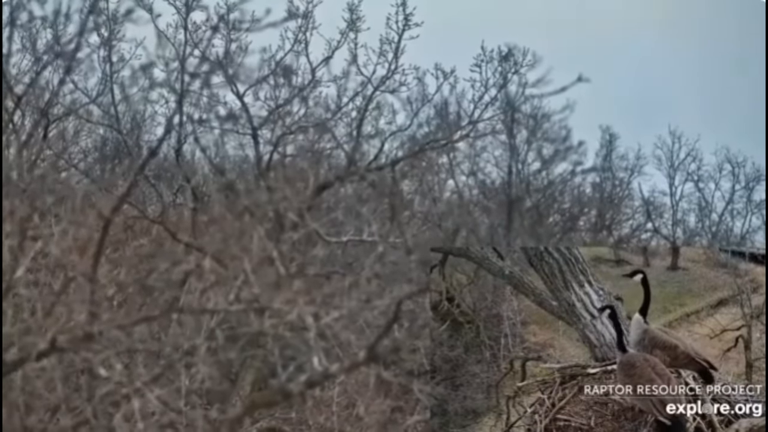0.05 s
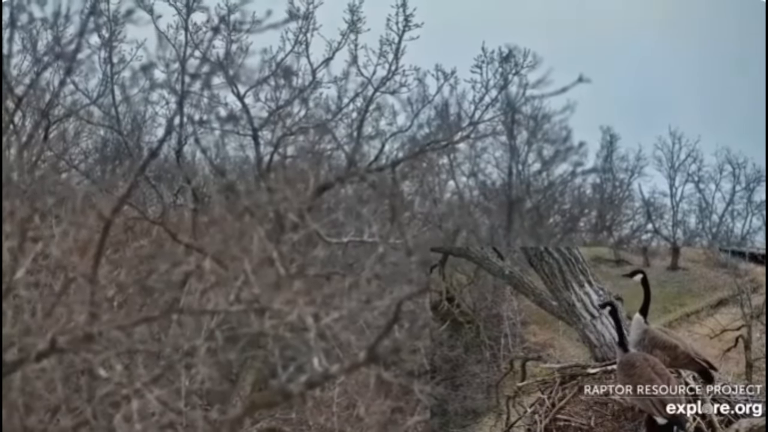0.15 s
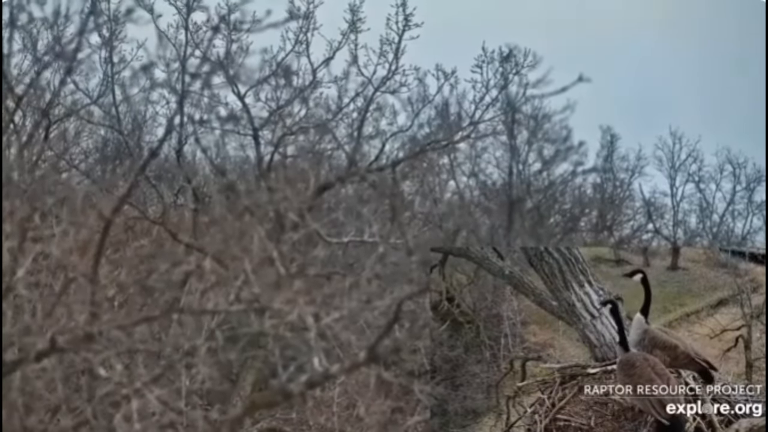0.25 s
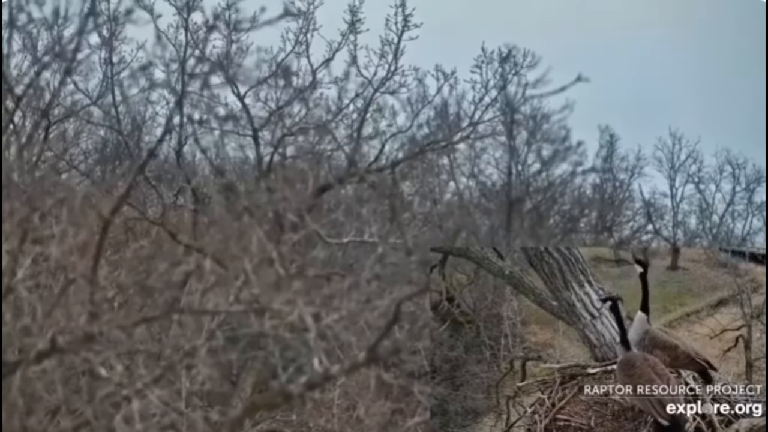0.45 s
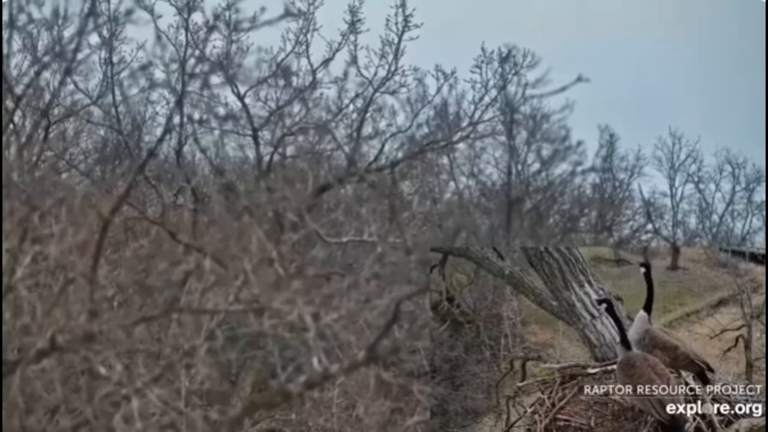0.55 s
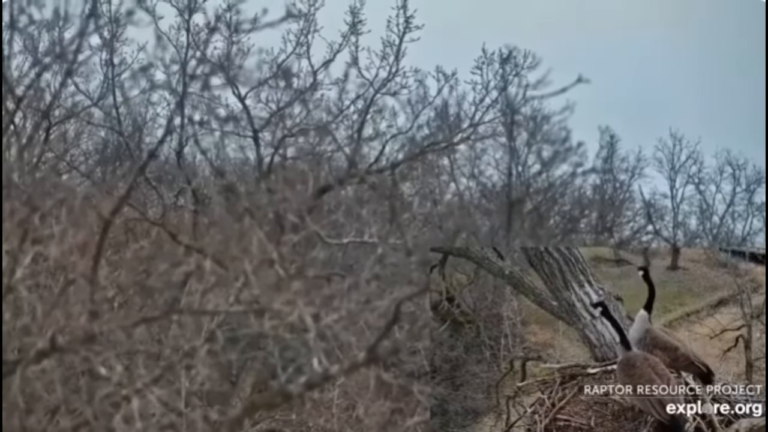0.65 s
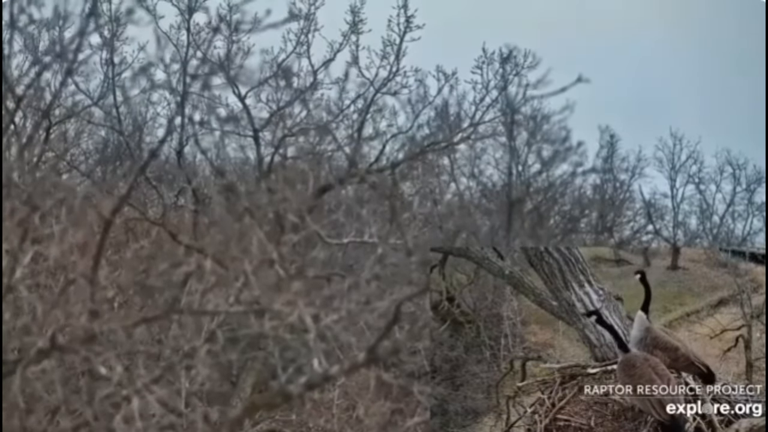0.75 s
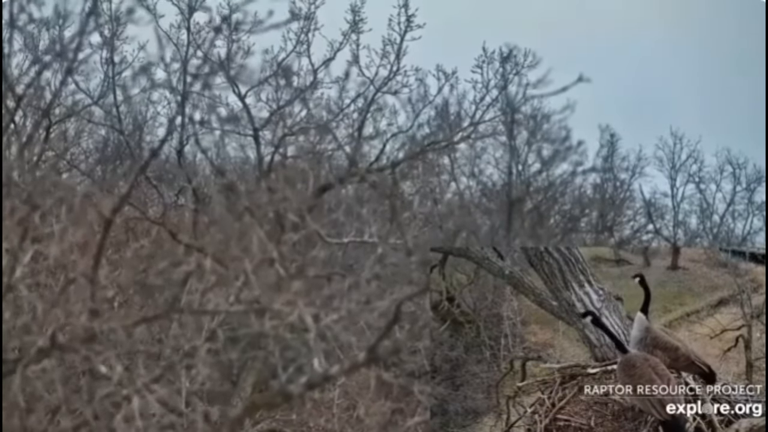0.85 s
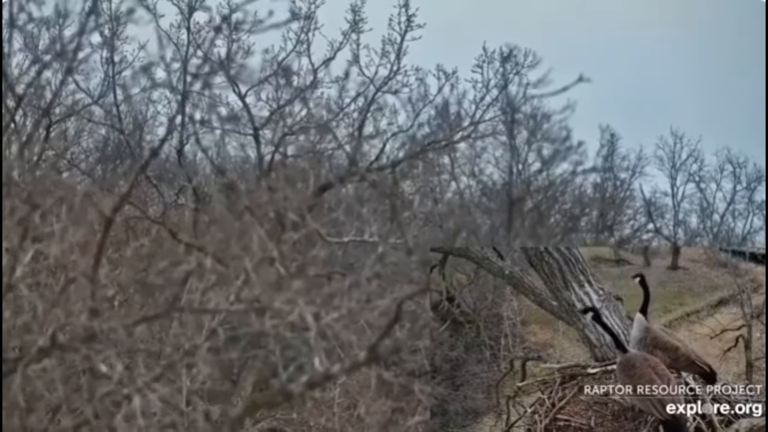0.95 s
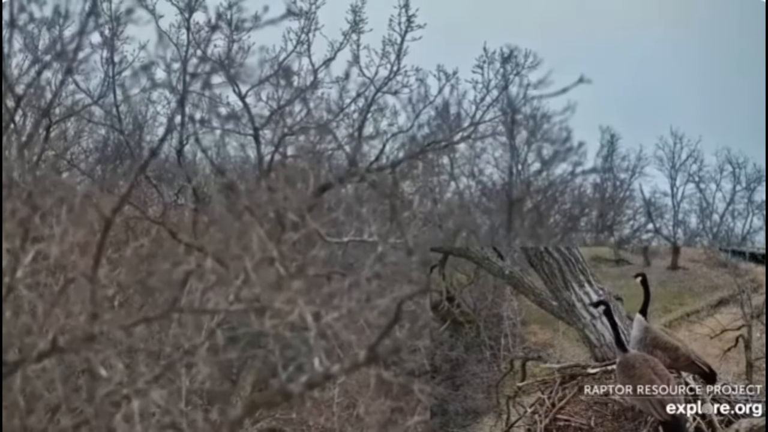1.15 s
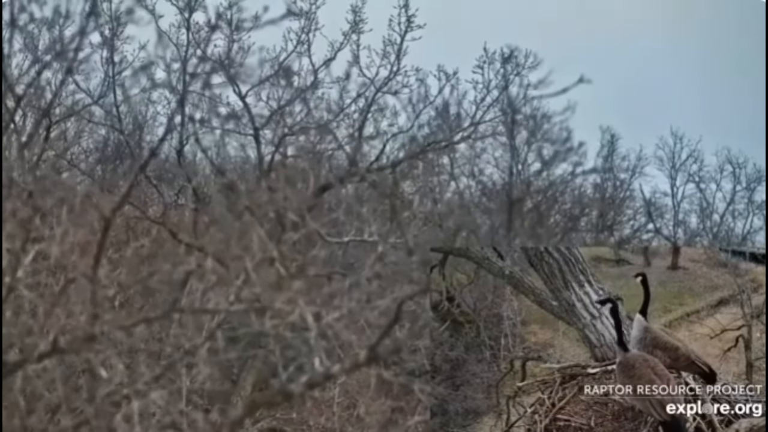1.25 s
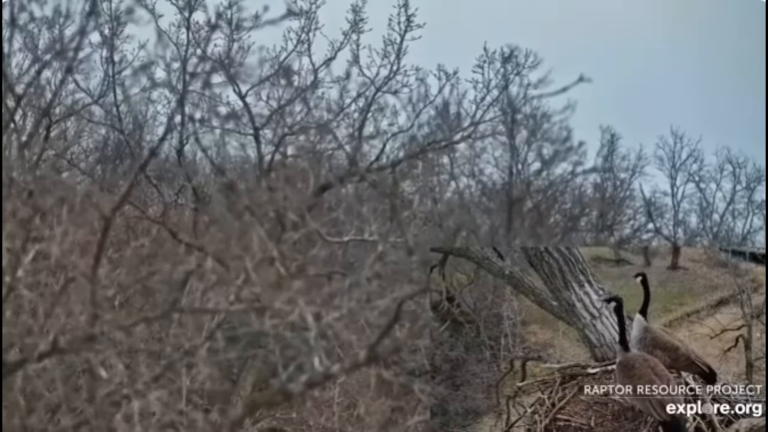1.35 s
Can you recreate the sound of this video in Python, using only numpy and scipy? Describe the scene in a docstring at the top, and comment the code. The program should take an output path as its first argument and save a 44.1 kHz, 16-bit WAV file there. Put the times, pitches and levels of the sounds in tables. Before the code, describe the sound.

Overlapping goose calls, one raspy grunting and one clear honking, overload a close microphone outdoors

```python
"""A quiet outdoor hush of shaped noise opens, with thin far whistles of narrow-band noise coming and going.
Two geese then call over each other on a stick nest: one grunts in slow, rasping pulses that ring chest and beak;
the other honks on a high harmonic note that sags as its beak closes. The trees add a faint, long echo of
decaying noise. Late on come two faint knocks, each a decaying sine.
The calls are so close to a small microphone that they overload it."""
import sys
import numpy as np
from scipy import signal
from scipy.fft import rfft, irfft, next_fast_len
from scipy.io import wavfile
from scipy.ndimage import map_coordinates

SR = 44100
rng = np.random.default_rng(int(sys.argv[2]) if len(sys.argv) > 2 else 0)


def file_out(sig):
    """Save sig as 16-bit WAV at sys.argv[1]."""
    # one column per channel
    cols = np.atleast_2d(sig).T
    # limit, then scale
    lim = np.clip(cols, -1, 1)
    pcm = np.round(lim * 32767).astype(np.int16)
    wavfile.write(sys.argv[1], SR, pcm)


N = 61739  # length in samples


def amp(db):
    """Decibel law: 20 dB is a tenfold amplitude."""
    return 10 ** (np.asarray(db) / 20)


def unit(x):
    """Normalisation to an rms of 1."""
    return x / np.sqrt(np.mean(x ** 2) + 1e-20)


def along(points, hz):
    """Logarithmic frequency scale: interpolate (Hz, value) points along it."""
    f, v = np.transpose(points)
    return np.interp(np.log(hz + 1), np.log(f + 1), v)


def curves(rows):
    """Envelope control: a gate over the rows' span, then one value per sample for each column."""
    s, *columns = np.transpose(rows)
    t = np.arange(N) / SR
    inside_s = np.minimum(t - s[0], s[-1] - t)
    gate = np.clip(inside_s / .002 + 1, 0, 1)  # 2 ms fades just outside the span
    return [gate] + [np.interp(t, s, column) for column in columns]


def wobble(rate):
    """Random modulation: a smooth curve through `rate` random knots a second."""
    knots = rng.standard_normal(4096)
    return map_coordinates(knots, [np.arange(N) * rate / SR], mode="wrap")


def coloured(x, points, keep_power=True):
    """Minimum-phase filtering: (Hz, dB) points made causal by folding the cepstrum."""
    m = 2 * next_fast_len(N // 2 + 4096)
    gain = amp(along(points, np.fft.rfftfreq(m, 1 / SR)))
    cepstrum = irfft(np.log(unit(gain) if keep_power else gain))
    cepstrum[1:m // 2] *= 2
    cepstrum[m // 2 + 1:] = 0
    return irfft(rfft(x, m) * np.exp(rfft(cepstrum)))[:N]


SKIRT_HZ = 705  # width of the second pole, which steepens the skirts


def resonance(x, hz, width_hz):
    """Heterodyne resonance: shift down, ring two poles, shift back; keeps the power of white noise."""
    turn = np.exp(2j * np.pi * np.cumsum(hz) / SR)
    near = np.exp(-np.pi * width_hz / SR)
    far = np.exp(-np.pi * SKIRT_HZ / SR)

    def ring(v):
        return signal.lfilter([1], np.poly([near, far]), v)

    response_size = np.linalg.norm(ring(signal.unit_impulse(SR // 10)))
    return np.sqrt(2) * (turn * ring(x / turn)).real / response_size


# Spectrum of the outdoor air: pitch_hz [Hz], level_db [relative dB per Hz]
AIR_SPECTRUM = [(30, -3), (70, -7), (120, 4), (170, 2.5), (290, 5), (500, 2.5), (800, -5.5), (1000, -2),
                (1350, 3), (1800, -7), (2150, -16.5), (2900, -10.5), (3400, -10.5), (3800, -22),
                (7000, -25.5), (15500, -33)]
HUSH_DB = -64  # rms before the microphone


def hush():
    """Stationary noise: steady outdoor air with a fixed spectrum."""
    return amp(HUSH_DB) * unit(coloured(rng.standard_normal(N), AIR_SPECTRUM))


FAR_WIDTH_HZ = 180
# Far whistles: middle_s [s], half_length_s [s, to 1/e], pitch_hz [Hz], level_db [dB at the middle]
WHISTLES = [(0.09, 0.076, 2990, -75), (0.165, 0.012, 4200, -75.5), (0.815, 0.2, 2200, -71.5),
            (1.159, 0.035, 4090, -74), (1.198, 0.18, 2878, -71)]


def far_tones():
    """Narrow-band noise: thin, blurred whistles swell and fade in the distance."""
    t = np.arange(N) / SR
    total = np.zeros(N)
    for middle_s, half_s, hz, db in WHISTLES:
        swell = np.exp(-((t - middle_s) / half_s) ** 2)
        total += amp(db) * swell * resonance(rng.standard_normal(N), np.full(N, hz), FAR_WIDTH_HZ)
    return total


PULSE_JITTER_S, PULSE_SCATTER_DB = 0.0003, 2.66  # timing scatter at full roughness, size scatter
FIRST_PULSE = .55  # cycles until a phrase's first pulse


def pulses(rate_hz, rough, gate):
    """Relaxation oscillation: one click a cycle, scattered in time and size; also the cycle count."""
    cycles = np.cumsum(rate_hz * (gate > 0)) / SR
    at = np.interp(np.arange(int(cycles[-1])) + FIRST_PULSE, cycles, np.arange(N)).astype(int)
    late, size = rng.standard_normal((128, 2))[:len(at)].T
    where = at + SR * PULSE_JITTER_S * rough[at] * late
    where = np.clip(where, 0, N - 1).astype(int)
    # sparser clicks are taller, so mean power is 1 before the size scatter
    height = np.sqrt(SR / rate_hz[at]) * amp(PULSE_SCATTER_DB * size)
    return np.bincount(where, height, N), cycles - FIRST_PULSE


PUFF_DECAY = 2.2  # decay of the air puff, per cycle
CHEST_AIR, BUZZ_AIR = .25, 2.6  # share of air per unit of roughness, up to 1
BEAK_WIDTH_HZ = 131
# the chest resonance follows this multiple of the pulse rate, over a broad body
CHEST_TUNING, CHEST_WIDTH_HZ, CHEST_RING_DB, CHEST_BODY_DB = 2.973, 85, -6, -2.5
BUZZ_RING_HZ, BUZZ_WIDTH_HZ, BUZZ_RING_DB = 3650, 150, -2
# Broad body of the chest: pitch_hz [Hz], level_db [relative dB]
CHEST_SPECTRUM = [(60, -20.5), (140, -15.5), (220, -2.5), (300, -3.5), (400, 4.5), (500, -14), (600, 0.5),
                  (780, -13), (1500, -7.5), (3000, -46), (8000, -94.5)]
# Treble of the clean clicks: pitch_hz [Hz], level_db [relative dB]
BUZZ_SPECTRUM = [(500, -29), (1200, 7), (1750, -4), (2100, -4), (2450, -11), (3200, 4), (3650, 1),
                 (4150, -15), (4750, -1), (5800, -11), (7000, -19), (8500, -33), (15000, -35.5)]
# Treble of the puffs of air: pitch_hz [Hz], level_db [relative dB]
RASP_SPECTRUM = [(500, -56), (1200, -22), (1750, 6), (2100, -7), (2600, 3.5), (3400, -12), (4150, -4.5),
                 (4750, -2), (5800, -14), (7000, -13), (8500, -21.5), (15000, -37.5)]
# Grunting goose, one list of rows a phrase: start_s [s], pulse_rate_hz [Hz], beak_hz [Hz],
# chest_db, beak_db, buzz_db [dB driving each part], roughness [0-1]
GRUNT_PHRASES = [
    [(.172, 143.8, 1240, -58.5, -66.5, -127, 0.14), (.197, 138.9, 1150, -40.5, -38, -66, 0.14),
     (.22, 145.9, 1260, -32, -31.5, -47.5, 0.14), (.231, 151.1, 1234, -39.5, -31, -51, 0),
     (.24, 151.5, 1130, -31.5, -38, -66.5, 0.2), (.252, 149.1, 1123, -32.5, -24.5, -43, 0.2),
     (.263, 127.4, 1155, -43.5, -35.5, -80, 0.08), (.288, 101.6, 1160, -53, -58, -80, 0.05)],
    [(.29, 109.1, 1110, -57, -75, -75, 0.1), (.319, 113.7, 1020, -47.5, -49, -62, .004),
     (.336, 117.9, 1126, -45.5, -45.5, -49.5, 0.08), (.368, 127.8, 1130, -43, -46, -50.5, 0.08),
     (.39, 143.6, 1140, -42.5, -50, -51.5, 0.08), (.403, 156.9, 1130, -42, -47.5, -64, 0.2),
     (.412, 159, 1100, -46.5, -40, -46.5, 0.2), (.426, 158.6, 1100, -34, -36.5, -44, 0.48),
     (.44, 157.7, 1204, -40.5, -30.5, -44.5, 0.32), (.462, 165, 1240, -36.5, -26.5, -38.5, .25),
     (.48, 165.7, 1176, -30, -22.5, -33.5, 0), (.505, 149.3, 1052, -30, -27.5, -44, 0.4),
     (.525, 140.7, 1197, -28.5, -25.5, -34.5, 0.17), (.59, 141.3, 1083, -27, -23.5, -35.5, 0.33),
     (.632, 146.1, 1155, -23.5, -16, -33, 0.29), (.654, 154.8, 1300, -51, -52, -40.5, 0.4),
     (.686, 162.8, 1200, -69, -50, -56, 0), (.695, 165, 1208, -27, -21.5, -39, .15),
     (.715, 156.7, 1050, -30, -19, -54, 0.2), (.735, 140.7, 1060, -54, -53, -44, 0.29),
     (.755, 140, 950, -46, -51, -80, 0.28)],
    [(.9205, 139, 1200, -54, -51.5, -109, 0.14), (.945, 140.8, 1180, -35, -31, -59, 0.14),
     (.963, 166, 1199, -33, -25, -43.5, 0.2), (.984, 160.8, 1142, -29, -21.5, -33, 0),
     (1.008, 142, 1070, -36, -27, -46, 0.1), (1.025, 145, 1040, -55, -60, -69, .2)],
]


def grunt(rows):
    """Source and filter: clicks and air puffs ring chest and beak; roughness turns treble buzz to rasp."""
    gate, rate_hz, beak_hz, chest_db, beak_db, buzz_db, rough = curves(rows)
    rough = np.clip(rough, 0, 1)
    clicks, cycles = pulses(rate_hz, rough, gate)
    puff_shape = np.exp(-PUFF_DECAY * (cycles % 1)) * np.sqrt(2 * PUFF_DECAY)
    puffs = rng.standard_normal(N) * puff_shape

    def split(air_share, db):
        level = gate * amp(db)
        return level * np.sqrt(1 - air_share) * clicks, level * np.sqrt(air_share) * puffs

    chest = sum(split(np.clip(CHEST_AIR * rough, 0, 1), chest_db))
    beak = sum(split(rough, beak_db))
    buzz, rasp = split(np.clip(BUZZ_AIR * rough, 0, 1), buzz_db)

    body = coloured(chest, CHEST_SPECTRUM) * amp(CHEST_BODY_DB)
    chest_ring = resonance(chest, CHEST_TUNING * rate_hz, CHEST_WIDTH_HZ) * amp(CHEST_RING_DB)
    beak_ring = resonance(trunk(beak), beak_hz, BEAK_WIDTH_HZ)
    buzz_ring = resonance(buzz, np.full(N, BUZZ_RING_HZ), BUZZ_WIDTH_HZ) * amp(BUZZ_RING_DB)
    treble = coloured(buzz, BUZZ_SPECTRUM) + buzz_ring + coloured(rasp, RASP_SPECTRUM)
    return body + chest_ring + beak_ring + treble


BOUNCE_S, BOUNCE_DB = 0.003254, -18.5


def trunk(x):
    """Single reflection: the trunk beside the nest throws back the beak part of the grunts."""
    n = np.arange(N)
    return x + amp(BOUNCE_DB) * np.interp(n - BOUNCE_S * SR, n, x)


HONK_JITTER, HONK_FLUTTER_DB = 0.0093, 1.5  # scatter of pitch (share) and of all but the fundamental's level
HONK_HISS_DB = -16.5  # hiss rms against the octave's peak, in a full honk
LOUD_DB, BRIGHTENS = -34.5, 0.25  # octave level of a full honk; extra dB of brightness per dB up to it
# Overtones: multiple [of the honk's pitch], level_db [dB against the octave in a full honk]
HONK_OVERTONES = [(3, -26), (4, -20), (5, -14.5), (6, -22.5), (7, -17), (10, -37)]
# Spectrum of the honk's hiss: pitch_hz [Hz], level_db [relative dB]
HISS_SPECTRUM = [(300, -41), (1200, -21), (1800, -6.5), (3300, 3.5), (4300, 7), (6000, 2), (8200, -9.5),
                 (10000, -7), (15000, -12.5)]
# Honking goose, one list of rows a note: start_s [s], pitch_hz [Hz],
# fundamental_db [dB rms], octave_db [dB rms, before flutter]
HONK_NOTES = [
    [(.222, 628, -37, -62), (.238, 604.5, -33.5, -37), (.249, 616, -51, -60), (.255, 617, -35, -27.5),
     (.264, 584, -74.5, -52.5), (.287, 577, -76, -58)],
    [(.4, 630.8, -42.5, -65), (.437, 620.9, -43, -34.5), (.47, 689.9, -36.5, -38.5),
     (.486, 661.9, -32, -20), (.515, 601.7, -38, -38.5), (.535, 595.7, -44, -60), (.585, 600, -45, -32),
     (.61, 606.2, -43, -34), (.64, 612.6, -48.5, -27), (.653, 627.8, -60, -19.5),
     (.672, 611.2, -31.5, -17.5), (.689, 587.3, -26, -14), (.695, 544, -58, -33.5)],
    [(.686, 682, -55, -45), (.697, 679.8, -34, -19.5), (.72, 643, -30.5, -20.5), (.733, 609, -41, -45.5),
     (.75, 576, -38, -41.5), (.765, 570.3, -84, -81)],
    [(.945, 690, -43, -36.5), (.962, 704.6, -55.5, -46), (.98, 662.6, -33, -18), (1.0, 641.3, -38, -31.5),
     (1.015, 590, -37.5, -46.5), (1.042, 584, -63, -50)],
]


def honk(rows):
    """Harmonic series: the octave swells as the beak opens; overtones and hiss grow faster up to a full honk."""
    gate, pitch_hz, low_db, octave_db = curves(rows)
    jittered_hz = pitch_hz * (1 + HONK_JITTER * wobble(300))
    phase = 2 * np.pi * np.cumsum(jittered_hz) / SR
    overtones = sum(amp(db) * np.sin(round(k) * phase) for k, db in HONK_OVERTONES)
    hiss = amp(HONK_HISS_DB) * coloured(rng.standard_normal(N), HISS_SPECTRUM)
    brightness = amp(BRIGHTENS * np.minimum(octave_db - LOUD_DB, 0))
    upper = np.sin(2 * phase) + brightness * (overtones + hiss)
    upper_level = amp(octave_db + HONK_FLUTTER_DB * wobble(250))
    return gate * np.sqrt(2) * (amp(low_db) * np.sin(phase) + upper_level * upper)


ECHO_DB, ECHO_DELAY_S = -30.5, 0.06  # level before the echo's colour; delay of its start
# Echo decay: pitch_hz [Hz], decay_s [s to fall 60 dB]
TREE_DECAY = [(200, 2.1), (600, 1.4), (1300, 1.66), (4000, 1.46), (7000, 1.2), (14000, 0.24)]
# Echo colour: pitch_hz [Hz], level_db [dB]
TREE_COLOUR = [(200, -19.5), (600, 0.5), (1000, -9), (1300, -4), (2500, -24), (4200, -6), (6000, -23.5),
               (14000, -25)]


def trees(x):
    """Diffuse reverberation: convolution with delayed noise whose highest treble dies first."""
    hz, t, bands = signal.stft(rng.standard_normal(SR), SR, nperseg=256)
    decay = amp(-60 * t / along(TREE_DECAY, hz)[:, None])
    tail = signal.istft(bands * decay, SR, nperseg=256)[1]
    tail = np.pad(tail / np.linalg.norm(tail), (int(ECHO_DELAY_S * SR), 0))
    return coloured(signal.fftconvolve(x, tail)[:N], TREE_COLOUR, keep_power=False)


TICK_HZ, TICK_T60_S = 1287, 0.034
# Faint knocks: start_s [s], level_db [dB, starting height of the decay]
KNOCKS = [(0.901, -42), (1.116, -51)]


def ticks():
    """Damped oscillation: short, faint knocks, each a decaying sine."""
    t = np.arange(N) / SR
    total = np.zeros(N)
    for start_s, db in KNOCKS:
        age = np.maximum(t - start_s, 0)
        total += amp(db) * amp(-60 * age / TICK_T60_S) * np.sin(2 * np.pi * TICK_HZ * age)
    return total


def scene():
    """Superposition: the calls, their echo, knocks, whistles and hush add up."""
    geese = sum(grunt(rows) for rows in GRUNT_PHRASES) + sum(honk(rows) for rows in HONK_NOTES)
    return (geese + amp(ECHO_DB) * trees(geese) + ticks() + far_tones() + hush())[None]


OVERLOAD_DB, KNEE = -24.7, 5.5  # ceiling before the microphone's colour, and its hardness
TOP_HZ = 15750  # band limit
# Microphone response: pitch_hz [Hz], level_db [dB]
MIC_RESPONSE = [(30, -63), (70, -42), (110, -31.5), (170, -8), (260, 0), (1200, -1), (2200, 5), (3500, 2),
                (5000, -3), (7000, -3), (8300, -8.5), (9700, -5.5), (15000, -6)]


def record(dry):
    """Saturation: the microphone clips, colours the sound and keeps nothing above its band limit."""
    fine = signal.resample_poly(dry[0], 2, 1)  # double rate while clipping limits aliasing
    clipped = fine / (1 + np.abs(fine / amp(OVERLOAD_DB)) ** KNEE) ** (1 / KNEE)
    x = coloured(signal.resample_poly(clipped, 1, 2), MIC_RESPONSE, keep_power=False)
    m = next_fast_len(N + SR // 10)
    passed = np.fft.rfftfreq(m, 1 / SR) < TOP_HZ
    return irfft(rfft(x, m) * passed, m)[None, :N]


dry = scene()
out = record(dry)
file_out(out)
```